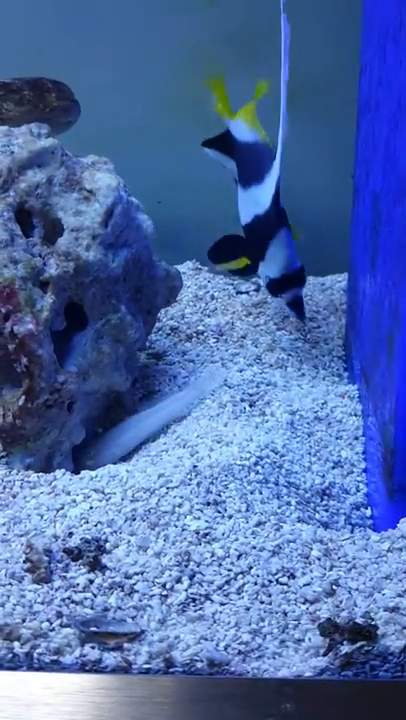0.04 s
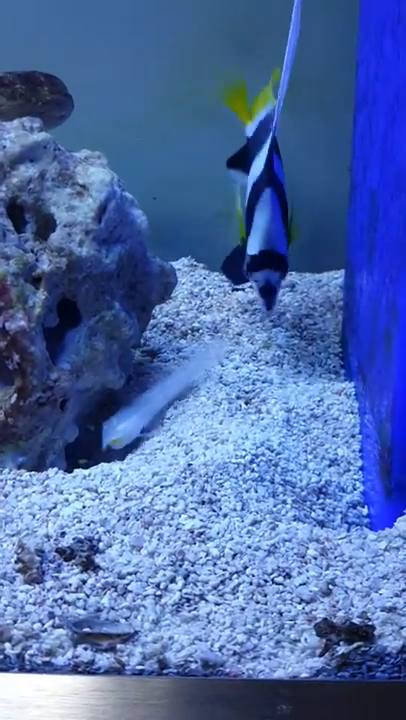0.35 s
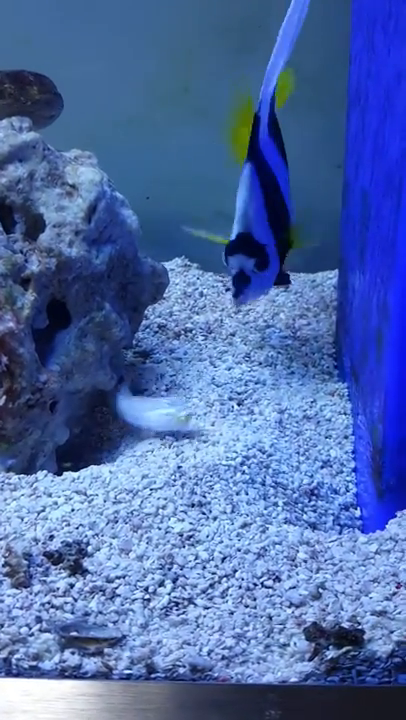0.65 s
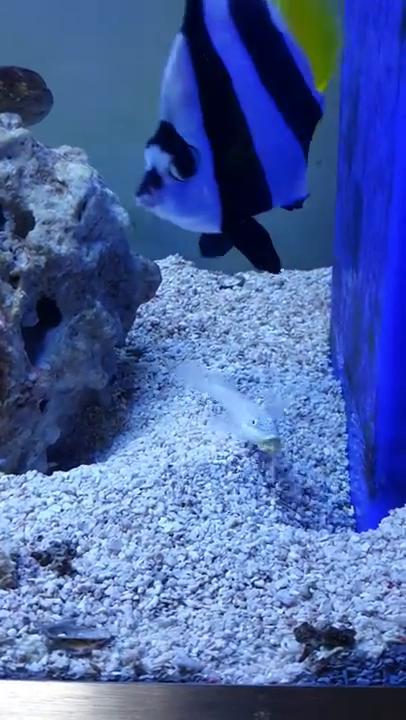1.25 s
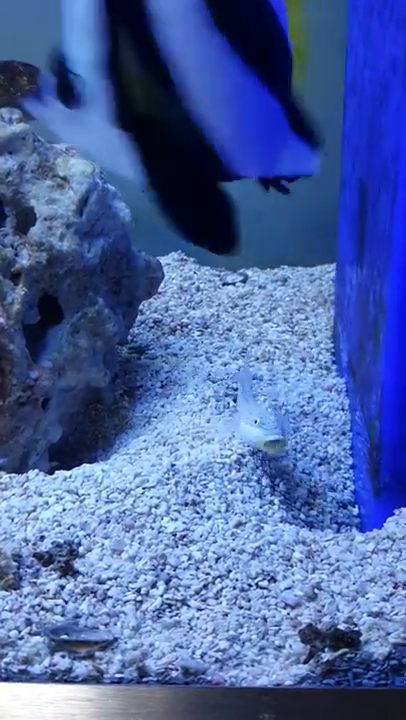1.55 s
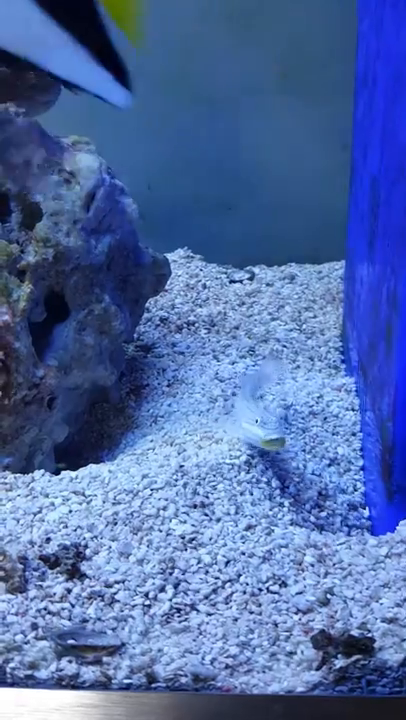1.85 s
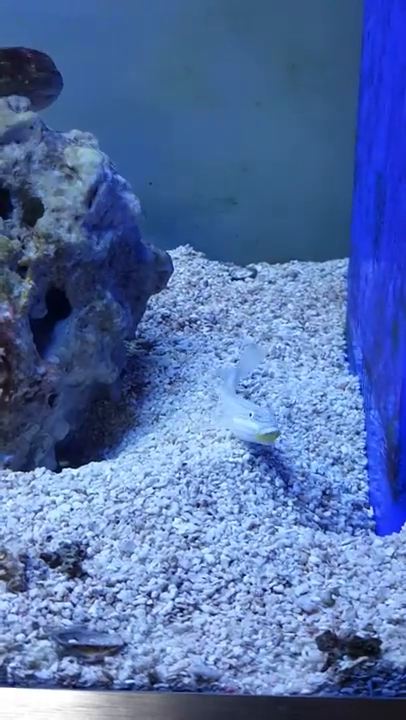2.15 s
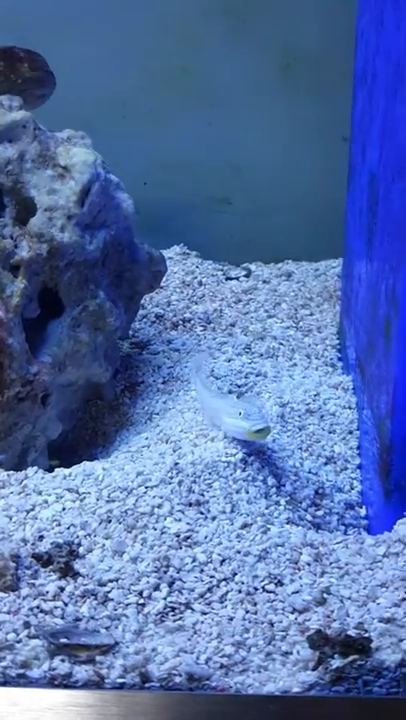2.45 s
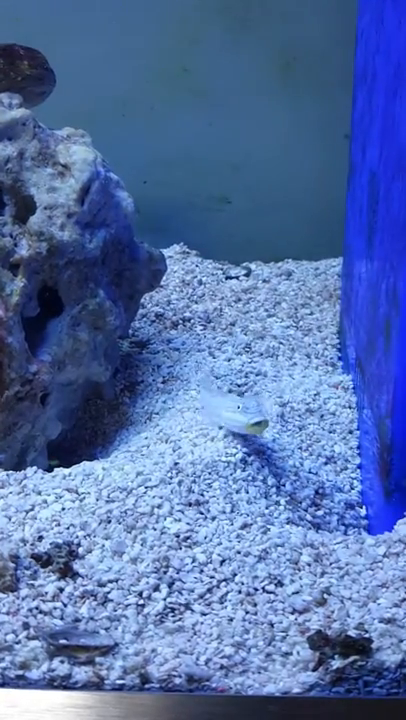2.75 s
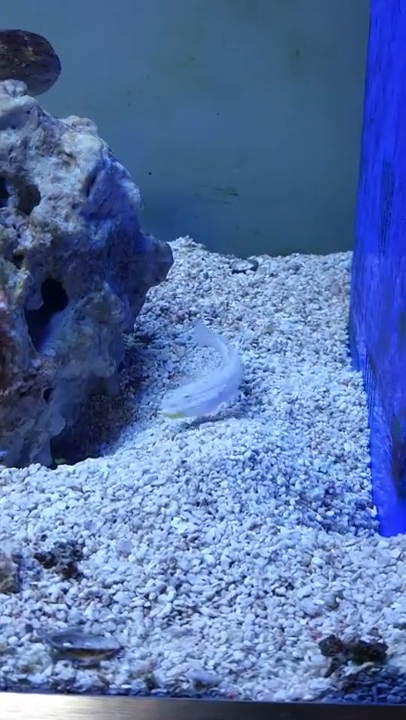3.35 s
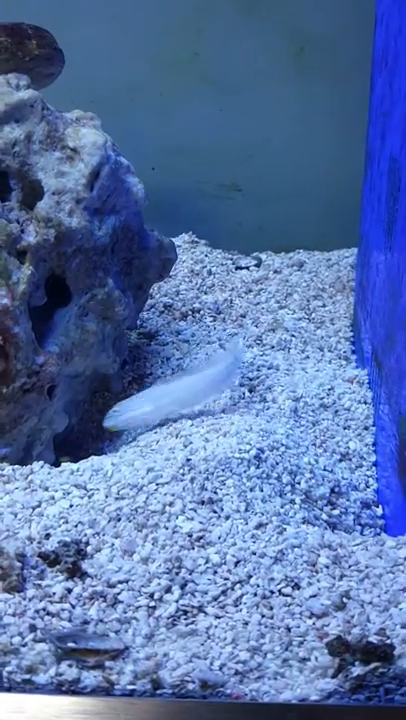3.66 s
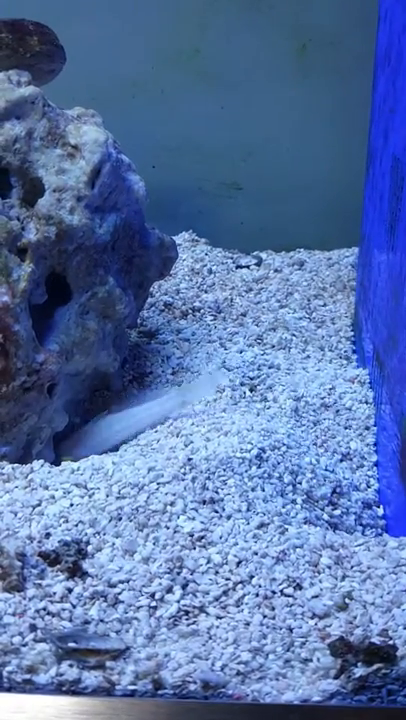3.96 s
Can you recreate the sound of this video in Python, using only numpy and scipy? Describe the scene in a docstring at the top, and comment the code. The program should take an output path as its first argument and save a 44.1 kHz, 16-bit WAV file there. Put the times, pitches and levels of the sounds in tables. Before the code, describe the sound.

A low aquarium pump hum and quiet water hiss, with soft handling bumps and one click.

```python
"""A low hum and a soft rush of water come from an aquarium on the left of a quiet room.
The pumps hum on mains power, a rotor rattles against its housing once a turn, and fine air
bubbles fizz, with a few tiny splashes and one sharp rotor tick. Close on the right, a hand shifts
on the recorder's case: a rumble, soft finger bumps and, near the end, one click."""
import sys
import numpy as np
from scipy import signal
from scipy.fft import rfft, irfft
from scipy.io import wavfile

SR = 44100
rng = np.random.default_rng(int(sys.argv[2]) if len(sys.argv) > 2 else 0)


def unload_wav(signal):
    """Save mono or channel-first audio to the path in sys.argv[1] as 16-bit WAV at rate SR, clipped to [-1, 1]."""
    wavfile.write(
        sys.argv[1],
        SR,
        np.round(np.clip(np.atleast_2d(signal).T, -1, 1) * 32767).astype(np.int16),
    )


N = 176400
T = np.arange(N) / SR


def from_db(db):
    """Turn decibels into a number to multiply by."""
    return 10 ** (np.asarray(db) / 20)


def rms_one(x):
    """Scale a signal so its average strength (rms) is 1."""
    return x / np.sqrt(np.mean(x ** 2) + 1e-20)


def in_time(rows):
    """Join timed points with straight lines, one curve for each level column."""
    times, *columns = np.transpose(rows)
    return [np.interp(T, times, column) for column in columns]


def drift(rate_hz):
    """A smooth random wobble of about 1 either way; a higher rate wobbles faster."""
    step, warm_up = 40, 2000
    r = np.exp(-2 * np.pi * rate_hz * step / SR)
    slow = signal.lfilter([1], [1, -2 * r, r * r], rng.standard_normal(N // step + warm_up + 2))
    slow = rms_one(slow[warm_up:])
    return np.interp(np.arange(N) / step, np.arange(len(slow)), slow)


def noise(spectrum):
    """Noise with a chosen level at each pitch."""
    hz, db = np.transpose(spectrum)
    bins_hz = np.maximum(np.arange(N // 2 + 1) * SR / N, 1)
    gain = from_db(np.interp(np.log(bins_hz), np.log(hz), db))
    return irfft(rfft(rng.standard_normal(N)) * gain, N) * np.sqrt(SR / 2)


def cut(x, hz, keep, order=2):
    """Keep the "low" or the "high" side of a pitch."""
    return signal.sosfilt(signal.butter(order, hz, keep, fs=SR, output="sos"), x + 1e-18)


def resonance(x, hz, width_hz):
    """Ring at one pitch; a narrower width rings longer."""
    r = np.exp(-np.pi * width_hz / SR)
    feedback = [1, -2 * r * np.cos(2 * np.pi * hz / SR), r * r]
    return signal.lfilter(np.array([1, 0, -1]) * (1 - r * r) / 2, feedback, x + 1e-18)


def noise_band(hz, width_hz):
    """Noise gathered around one pitch, at strength 1."""
    return rms_one(resonance(rng.standard_normal(N), hz, width_hz))


def impulses(times_s, db):
    """Kicks one sample long at the given times."""
    return np.bincount((np.abs(times_s) * SR).astype(int), from_db(db), N)[:N]


def fade(x, seconds):
    """Give each kick a tail that dies away."""
    return signal.lfilter([1], [1, -np.exp(-1 / (seconds * SR))], x + 1e-18)


# Tones of the mains hum: pitch_hz, level_db
HUM_TONES = [(100, -49.5), (150, -56), (200, -54.5), (350, -68), (400, -77), (600, -69), (700, -81)]
# Faint motor whines: pitch_hz, level_db, width_hz
MOTOR_WHINES = [(174, -61.5, 10), (205.7, -61.5, 12), (519.5, -66.5, 23), (695, -74.5, 7.9),
                (839, -77, 9.8), (866, -72, 19), (3442, -73, 35), (3583, -77, 16), (5205, -78, 4.3)]

def pump_hum(waver_db=1.03):
    """Mains power makes the pumps hum in slightly wavering tones while their motors whine."""
    hum = 0
    for hz, db in HUM_TONES:
        strength = from_db(db - waver_db * drift(6.6))
        hum += strength * np.sqrt(2) * np.sin(2 * np.pi * (hz * T + rng.random()))
    return hum + sum(from_db(db) * noise_band(hz, width) for hz, db, width in MOTOR_WHINES)


# The water's basic rush: pitch_hz, level_db_per_hz
WATER_SPECTRUM = [(20, -81), (45, -88), (90, -67), (200, -74), (260, -75.5), (330, -83), (420, -81.5),
                  (560, -83), (700, -86), (1050, -89.5), (1350, -95), (2000, -95), (2800, -100),
                  (4300, -99.5), (6200, -104.5), (9000, -103.5), (12000, -106), (15500, -111)]
# How its splashy middle swells: time_s, gain_db
SPLASH_SWELL = [(0, 3), (.8, 2.5), (1.1, 3), (1.6, 5), (1.95, 6), (2.3, 4.5), (2.7, 3), (3.2, 5), (4, 3)]
# How its low gurgle swells: time_s, gain_db
GURGLE_SWELL = [(0, -2.5), (1.25, -2), (1.4, 0.5), (1.65, -1), (1.8, -0.5), (2.3, -0.5), (2.7, -2),
                (3.3, 0), (4, 0)]

def water_rush(flicker_db=1.47):
    """Circulating water rushes; its gurgle swells and its splashy middle flickers with the flow."""
    rush = noise(WATER_SPECTRUM)
    gurgle = cut(rush, 800, "low", order=1)
    splash = resonance(rush, hz=1730, width_hz=1950)
    gurgle_gain = from_db(in_time(GURGLE_SWELL)[0])
    splash_gain = from_db(in_time(SPLASH_SWELL)[0] + flicker_db * drift(36))
    # Subtract 1 because the rush already holds each part once.
    return rush + gurgle * (gurgle_gain - 1) + splash * (splash_gain - 1)


# Pitches at which the housing rings: pitch_hz, width_hz, gain_db
HOUSING_RINGS = [(1766, 140, 0.5), (3450, 390, -7.5), (4460, 64, 5), (4713, 134, -1), (5650, 300, -11),
                 (6650, 110, -2), (7400, 80, -0.5), (7910, 82, 0.5), (8460, 43, 4), (11660, 250, -10),
                 (13330, 720, -13)]
# How hard the rotor drives the lower and upper rings: time_s, lower_db, upper_db
RATTLE_FORCE = [(0, 2, -7), (.22, 1.5, -8), (.4, 1.5, -1), (.5, -11, -12), (.56, 1.5, -1),
                (.85, -1.5, -5.5), (1.12, -1, -5), (1.42, 1, -7), (1.7, -1, -5), (1.95, -6, -2),
                (2.15, -3, -3), (2.4, -1.5, -1.5), (2.65, -7, -7), (2.95, -5, -5.5), (3.2, 1, -0.5),
                (3.5, 0, -5), (4, 0, -4.5)]
# Jolts that change the force for a turn or two: start_s, lower_added_db, upper_added_db
ROTOR_JOLTS = [(.090, 3, 6), (.195, 4, 6), (.207, 3, 5), (.54, 7, 2), (.585, 4.5, -3), (.608, 3, -2),
               (.758, 10.5, 2), (.966, 8.5, 3), (1.012, 5, 6.5), (1.07, 1, 2), (1.14, 6.5, 0),
               (1.219, 5, 9), (1.268, 3.5, 8), (1.546, -2, 9), (1.557, -2, -8), (1.669, 4, 4),
               (1.705, 7, 11), (1.83, 11.5, 7), (1.912, 9, 7), (2.41, 0, 4), (3.0, -5, 11)]

def rotor_rattle(turns_per_s=86.75, jolt_fade_s=.014, upper_above_hz=6000, level_db=-61):
    """Once a turn the rotor knocks and scrapes its housing, which rings; a faint rub runs underneath."""
    knock_db, scrape_db, rub_db = -6.5, -4.5, -17
    turn_spread_db, ring_spread_db = 2.2, 1
    hits_s = np.arange(0, N / SR, 1 / turns_per_s) + .0089  # contact comes late in each turn
    force_db = np.array([np.interp(hits_s, T, level) for level in in_time(RATTLE_FORCE)])
    force_db += turn_spread_db * rng.standard_normal(len(hits_s))
    for start_s, *added_db in ROTOR_JOLTS:
        begun = hits_s > start_s - .5 / turns_per_s  # from the nearest hit on
        dying = np.exp(-np.maximum(hits_s - start_s, 0) / jolt_fade_s)
        force_db += np.outer(added_db, begun * dying)
    out = 0
    for hz, width, db in HOUSING_RINGS:
        hits_db = force_db[int(hz > upper_above_hz)] + ring_spread_db * rng.standard_normal(len(hits_s))
        knocks = impulses(hits_s, hits_db)
        scrapes = from_db(scrape_db) * rms_one(fade(knocks, seconds=.0028))
        friction = (scrapes + from_db(rub_db)) * rng.standard_normal(N)
        out += from_db(db) * resonance(friction + from_db(knock_db) * rms_one(knocks), hz, width)
    return from_db(level_db) * rms_one(out)


# Bands of bubble hiss: pitch_hz, width_hz, base_level_db
FIZZ_BANDS = [(9020, 780, -70.5), (10420, 630, -73.5), (11600, 450, -73.5), (13100, 500, -87)]
# How the lower and upper bands swell: time_s, lower_gain_db, upper_gain_db
FIZZ_SWELL = [(0, 0, -4), (.35, 1.5, -4), (.5, 1, 0), (.68, 0.5, -9), (1.0, 3, -4), (1.22, 0.5, -2),
              (1.48, 3, -5), (1.8, 1.5, -10), (2.2, -1, -12), (2.85, 0, -19), (3.02, 0.5, 1), (3.15, 0, 1),
              (3.35, 2, 2), (4, -0.5, 1.5)]

def bubble_fizz(upper_above_hz=11000, flicker_db=2.5):
    """Fine air bubbles hiss in high, flickering bands that come and go."""
    swells_db = in_time(FIZZ_SWELL)
    out = 0
    for hz, width, db in FIZZ_BANDS:
        level_db = db + swells_db[int(hz > upper_above_hz)] + flicker_db * drift(60)
        out += from_db(level_db) * noise_band(hz, width)
    return out


# The room's background: pitch_hz, level_db_per_hz
ROOM_SPECTRUM = [(5, -103), (14, -62.5), (35, -68), (80, -68), (160, -81), (300, -98), (600, -101),
                 (1500, -106), (4000, -111), (8000, -123), (14500, -115)]

def room_noise():
    """The quiet room gives a steady low rumble and a faint hiss."""
    return noise(ROOM_SPECTRUM)


# The hand's basic rumble: pitch_hz, level_db_per_hz
HAND_SPECTRUM = [(15, -76), (28, -57), (42, -48), (65, -51), (110, -56), (170, -66.5), (260, -74.5),
                 (400, -84), (800, -102), (1600, -115)]
# How it swells as the grip shifts: time_s, gain_db
GRIP_SWELL = [(0, -15.5), (.75, -22.5), (.83, -15), (.93, -13), (1.0, -17.5), (1.95, -17.5), (2.1, -11),
              (2.35, -13.5), (2.65, -31), (2.8, -5.5), (3.0, -4.5), (3.15, 0.5), (3.3, -.5), (3.45, -1.5),
              (3.68, -13.5), (4, -10.5)]

def hand_rumble():
    """Skin moving on the case makes a deep rumble."""
    return from_db(in_time(GRIP_SWELL)[0]) * noise(HAND_SPECTRUM)


# Fingers bumping the case: start_s, peak_db, contact_s, low_edge_hz
FINGER_BUMPS = [(0.808, -33.5, .0015, 55.3), (0.916, -35.5, 0.00075, 55), (1.397, -28, 0.0013, 52.7),
                (1.61, -40, 0.00065, 90), (2.033, -25.5, 0.00095, 47.8), (2.097, -36.5, 0.00088, 50.3),
                (2.228, -28, 0.00071, 81), (2.276, -33.5, 0.00061, 70.5), (2.308, -32.5, 0.00072, 69.4),
                (2.403, -33, 0.00067, 70), (2.719, -26, .001, 50.6), (2.856, -29, 0.00057, 104),
                (2.95, -29.5, 0.0017, 49.4), (3.059, -28.5, 0.00088, 69), (3.116, -17.5, 0.00064, 47),
                (3.18, -28.5, 0.00075, 70), (3.24, -35, 0.00053, 90.5), (3.41, -37, 0.00076, 80),
                (3.679, -37.5, 0.00039, 130), (3.86, -32, 0.00053, 70)]

def finger_bumps(case_ring_db=-20):
    """Each soft push thumps and rings the case a little; longer contact sounds duller."""
    out = 0
    for start_s, peak_db, contact_s, low_edge_hz in FINGER_BUMPS:
        age = np.clip((T - start_s) / contact_s, 0, 40)
        push = cut(-age ** 4 * np.exp(-age), low_edge_hz, "high", order=5)
        bump = push + from_db(case_ring_db) * resonance(push, hz=260, width_hz=370)
        out += from_db(peak_db) * bump / np.abs(bump).max()
    return out


# Tiny splashes and one sharp rotor tick (at 1.554 s):
# mid_rise_s, base_level_db, pitch_hz, width_hz, rise_s
SPLASHES_AND_ROTOR_TICK = [(0.981, -42.5, 1620, 280, 0.0045), (1.10, -51, 1750, 400, 0.013),
                           (1.27, -55.5, 2010, 350, 0.0081), (1.375, -49, 685, 600, 0.018),
                           (1.554, -49.5, 8140, 450, .008), (1.61, -45, 247, 200, 0.018),
                           (1.723, -53, 2950, 800, 0.0034), (1.769, -53, 2900, 600, 0.0035),
                           (1.913, -50, 2140, 800, 0.0055), (2.02, -45.5, 845, 299, 0.008),
                           (2.038, -45.5, 2660, 800, 0.0037), (2.285, -51, 830, 250, 0.012),
                           (3.047, -49, 3000, 1400, .0043), (3.40, -51, 780, 250, 0.019)]

def splashes_and_rotor_tick(gain_db=-5):
    """Tiny splashes, and one harder rotor knock ringing high in the housing, each swell and die fast."""
    out = 0
    for mid_rise_s, db, hz, width, rise_s in SPLASHES_AND_ROTOR_TICK:
        tone = rms_one(resonance(noise_band(hz, width), hz, width))
        age = np.clip((T - mid_rise_s) / rise_s + .5, 0, 20)
        out += from_db(db + gain_db) * tone * age * np.exp(1 - age)
    return out


# The click's two kicks, weak then strong: start_s, kick_db
CLICK_KICKS = [(3.6642, -43), (3.6809, -24.5)]

def case_click():
    """The case gives two dry snaps, so close together that they sound like one click."""
    kicks = impulses(*np.transpose(CLICK_KICKS))
    return cut(fade(kicks, seconds=.0018), 2580, "low", order=3)


def reflections(x, echo_db=-10.5, fade_60_db_s=.041):
    """Sound bounces off the glass and the cabinet, adding a short blur of echoes."""
    age_s = T[:8192]
    tail = rng.standard_normal(len(age_s)) * from_db(-60 * age_s / fade_60_db_s) * (age_s > .002)
    echoes = signal.fftconvolve(x, tail / np.linalg.norm(tail))[:N]
    echo_gain = from_db(echo_db)
    return (x + echo_gain * echoes) / np.hypot(1, echo_gain)


def scene(hum_right_db=-14, water_right_db=-22.5):
    """The tank is on the left; the hand and the room are on the right, with faint hum and water."""
    hum = pump_hum()
    hand = hand_rumble() + finger_bumps() + case_click()
    rattle = rotor_rattle()
    left = hum + reflections(water_rush() + rattle + bubble_fizz() + splashes_and_rotor_tick())
    right = from_db(hum_right_db) * hum + from_db(water_right_db) * water_rush() + room_noise() + hand
    return np.array([left, right])


def record(dry):
    """The very highest treble is cut off steeply."""
    top_hz = 15720
    return signal.sosfilt(signal.ellip(12, .1, 80, top_hz, fs=SR, output="sos"), dry)


dry = scene()
out = record(dry)
unload_wav(out)
```